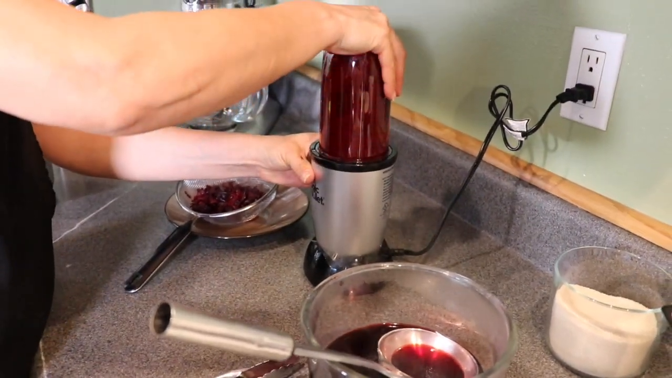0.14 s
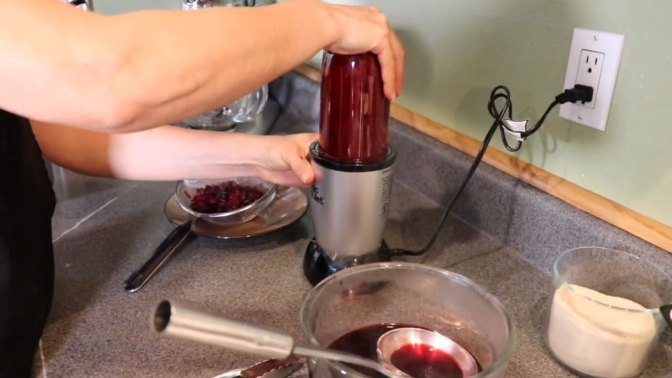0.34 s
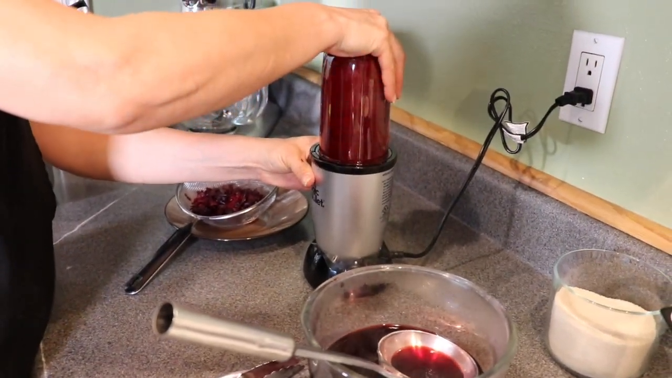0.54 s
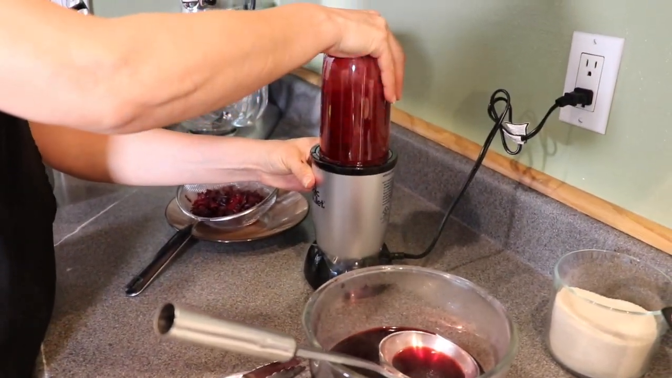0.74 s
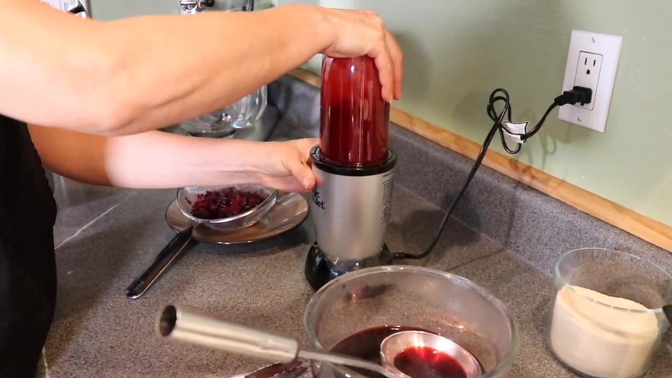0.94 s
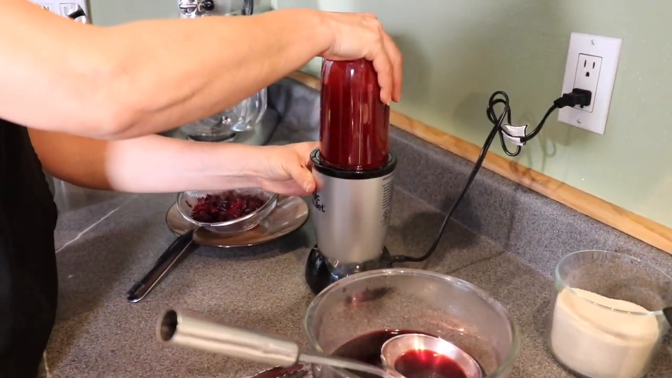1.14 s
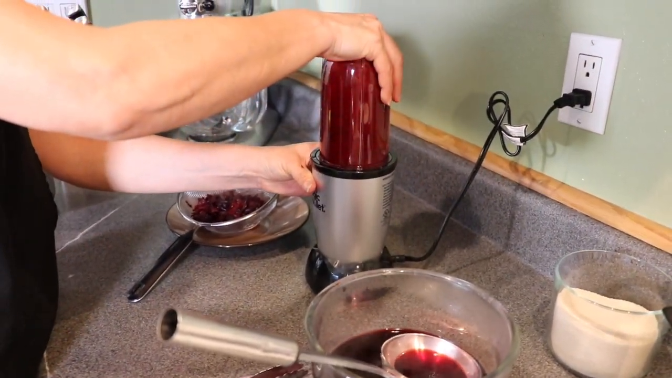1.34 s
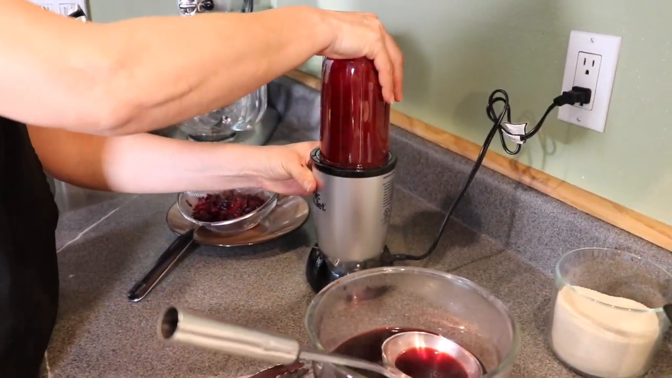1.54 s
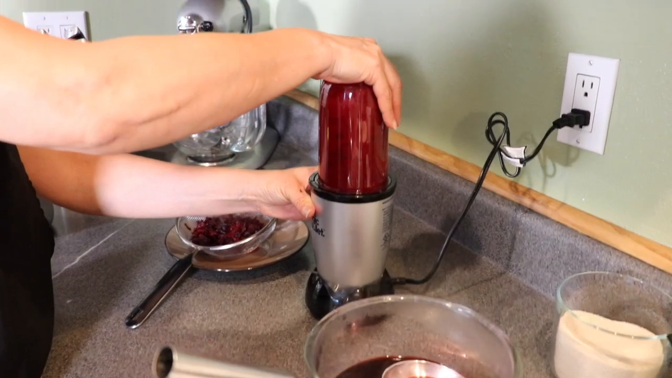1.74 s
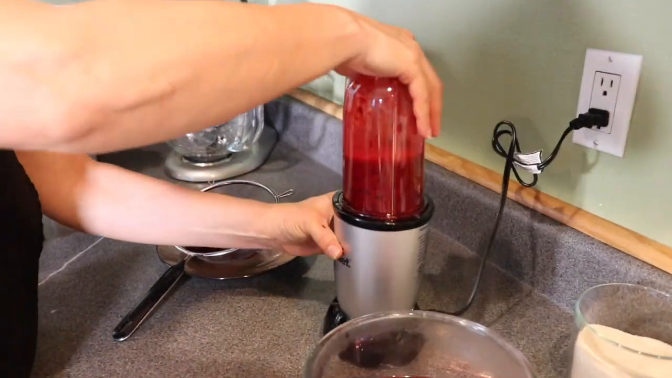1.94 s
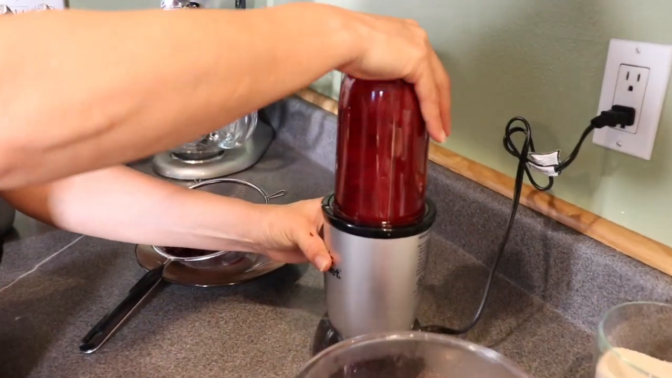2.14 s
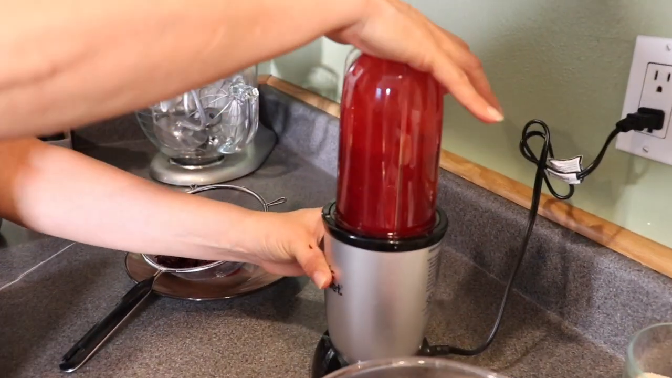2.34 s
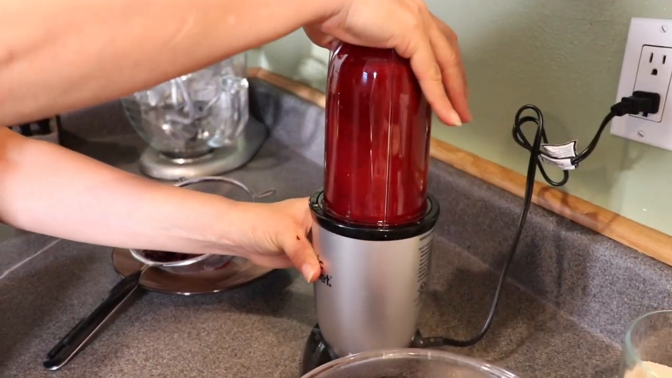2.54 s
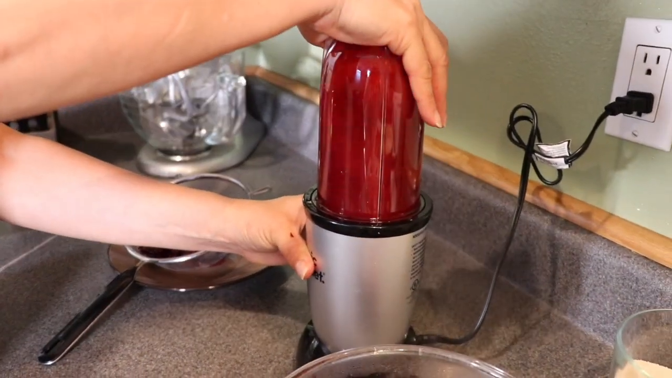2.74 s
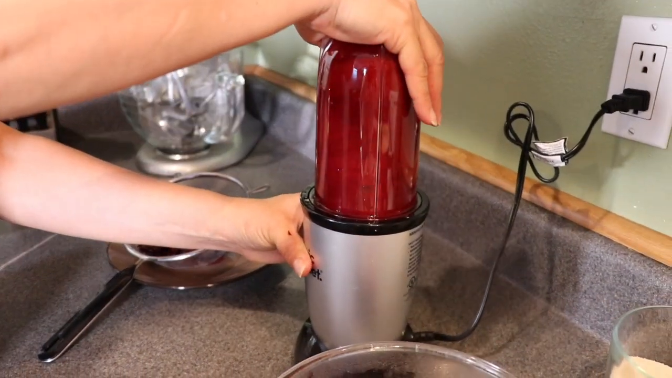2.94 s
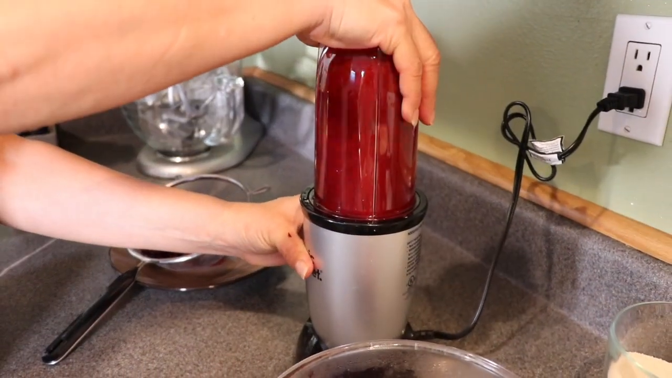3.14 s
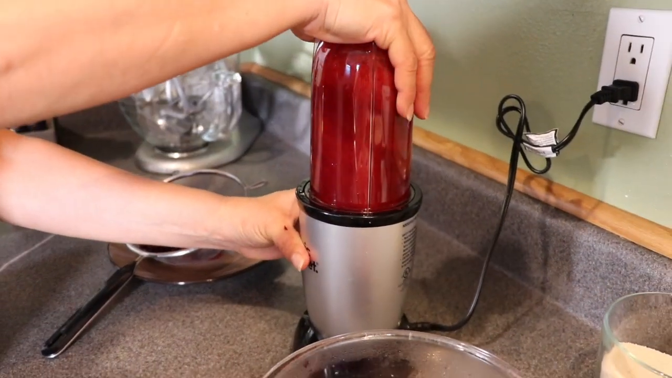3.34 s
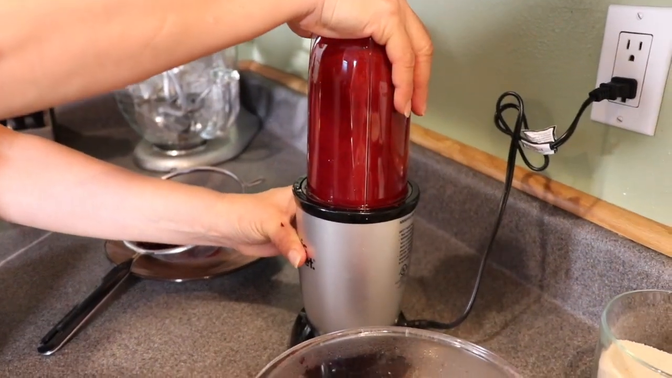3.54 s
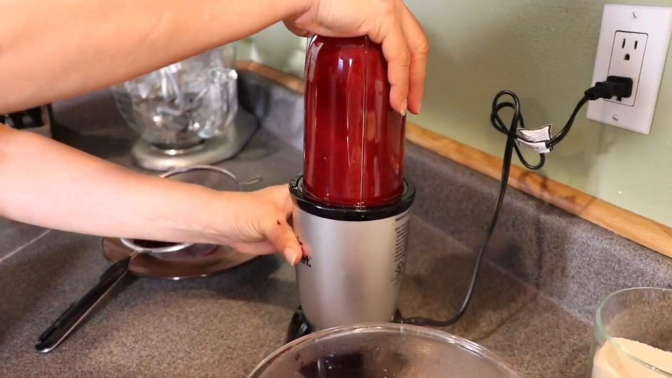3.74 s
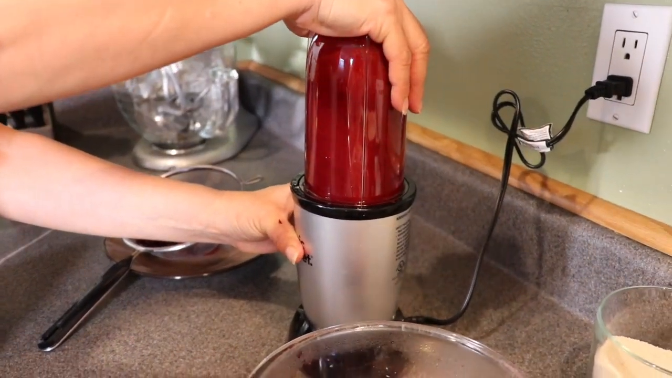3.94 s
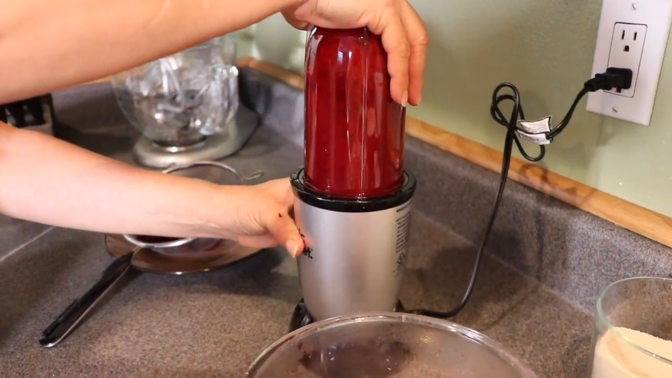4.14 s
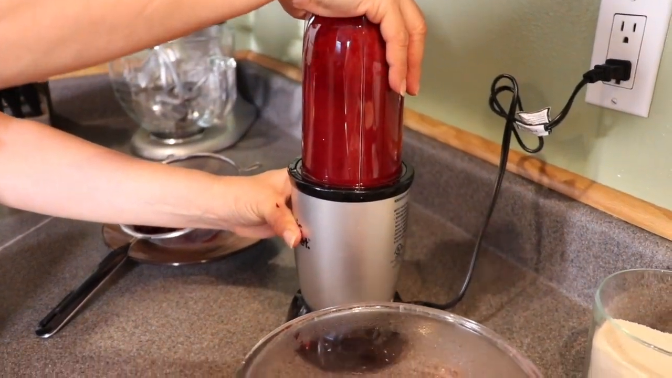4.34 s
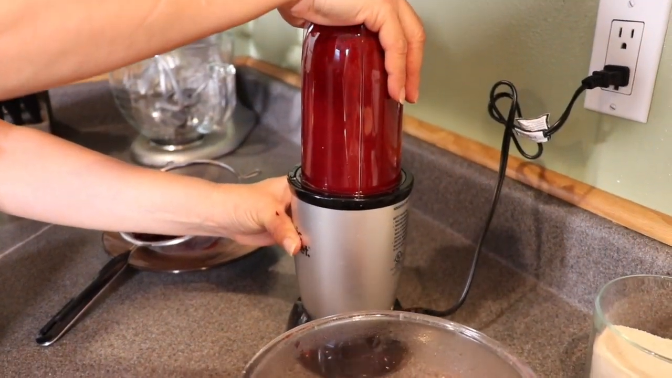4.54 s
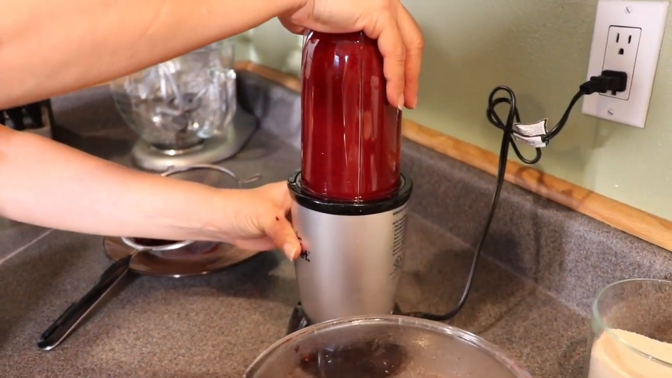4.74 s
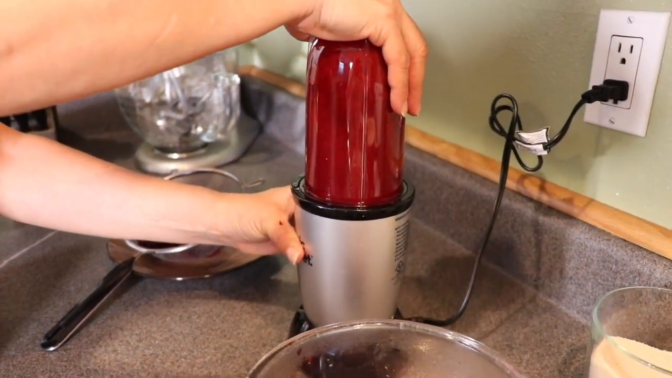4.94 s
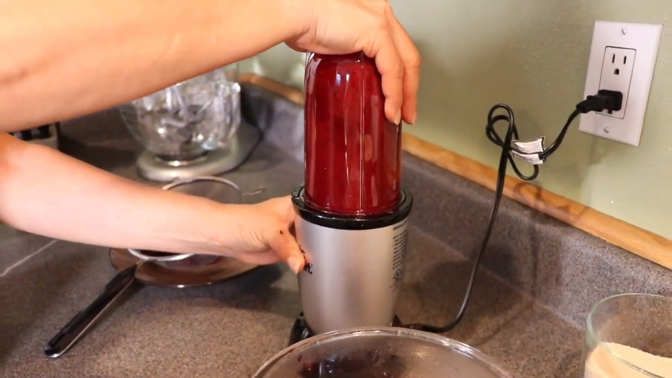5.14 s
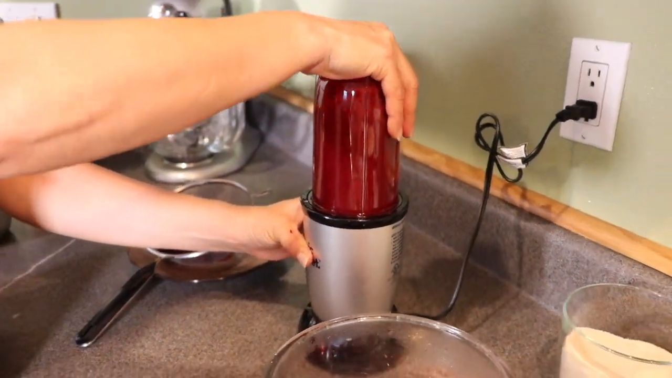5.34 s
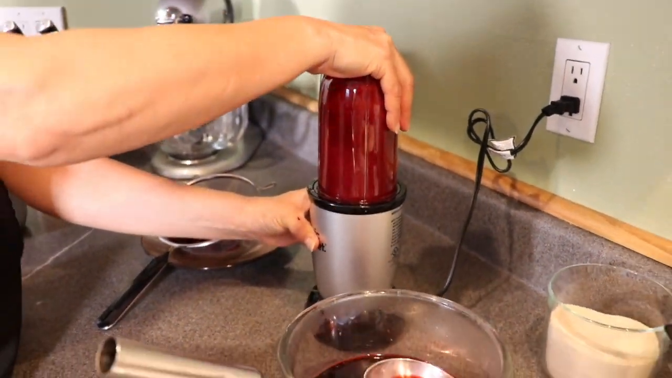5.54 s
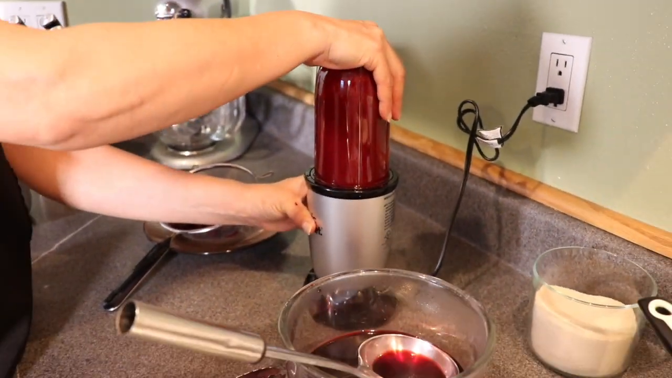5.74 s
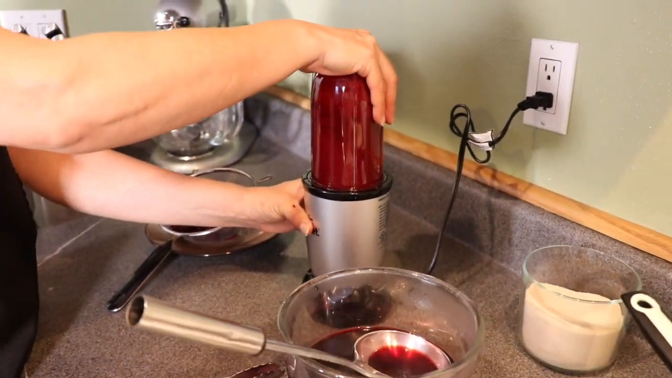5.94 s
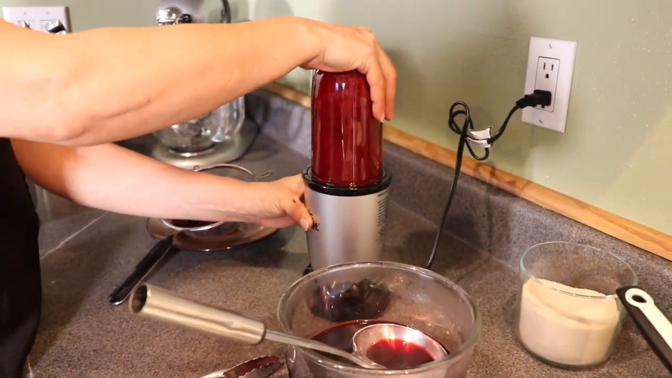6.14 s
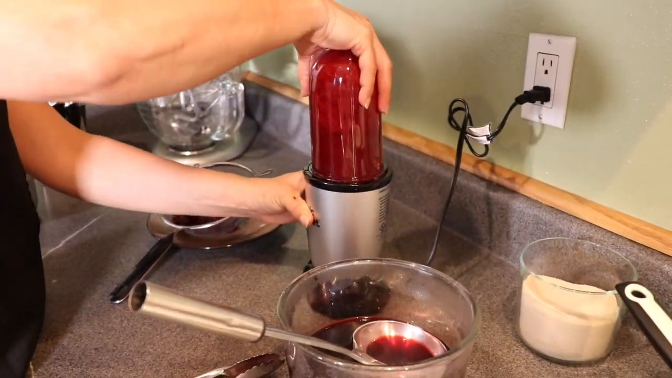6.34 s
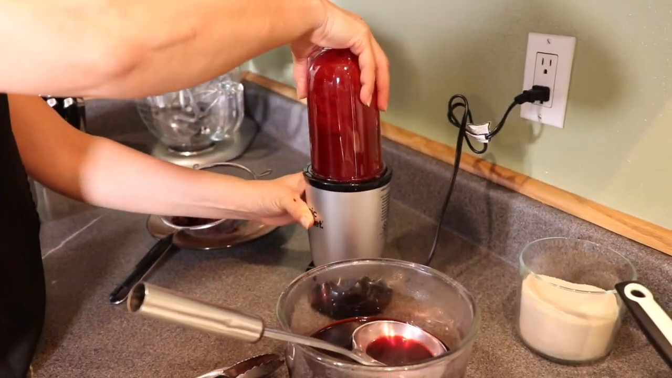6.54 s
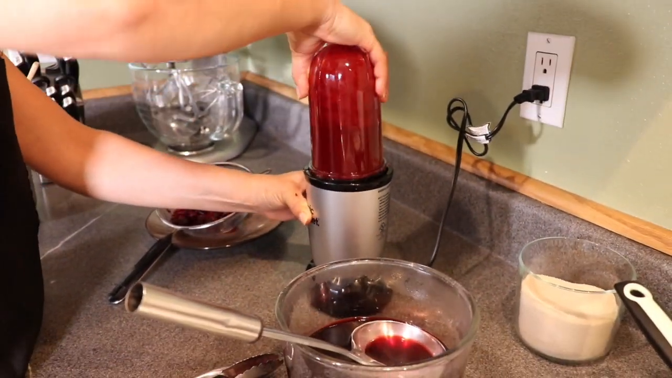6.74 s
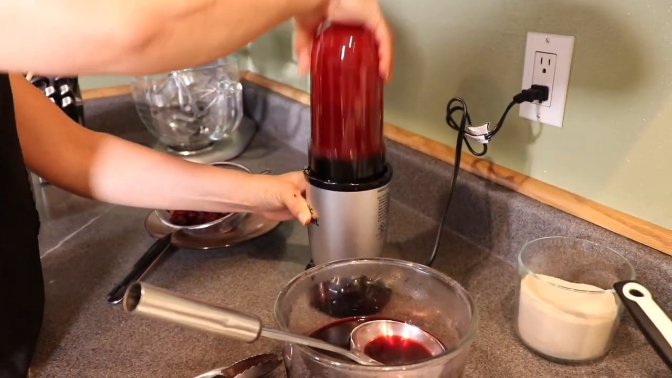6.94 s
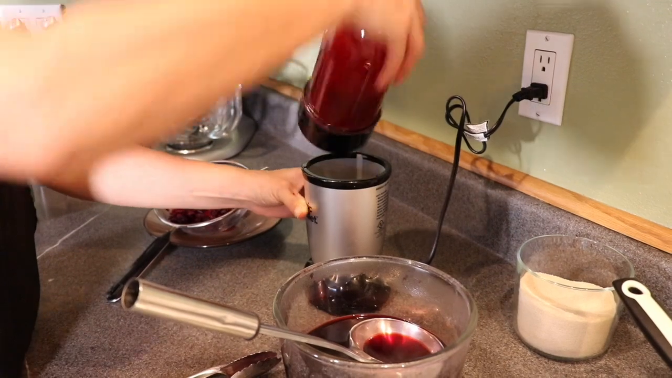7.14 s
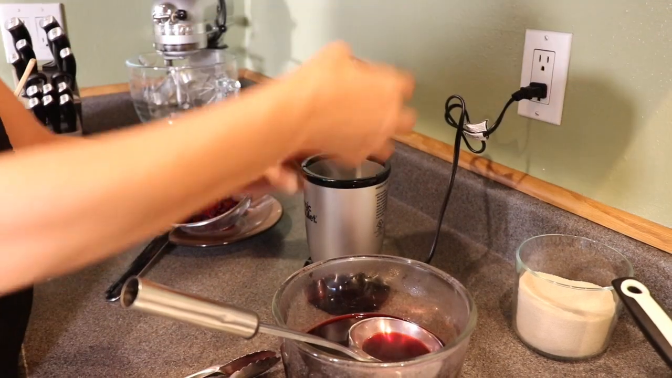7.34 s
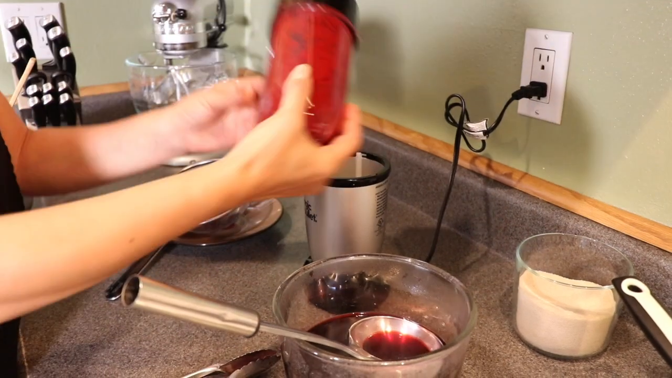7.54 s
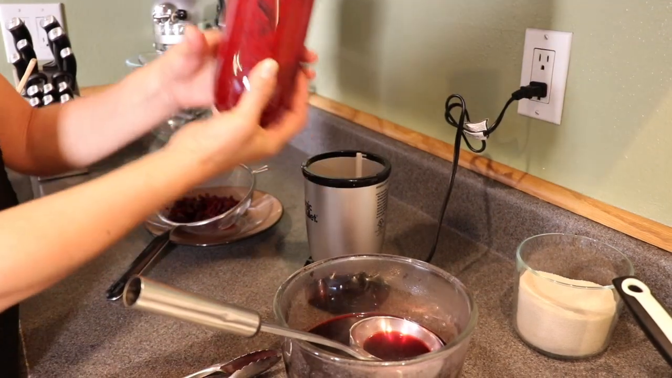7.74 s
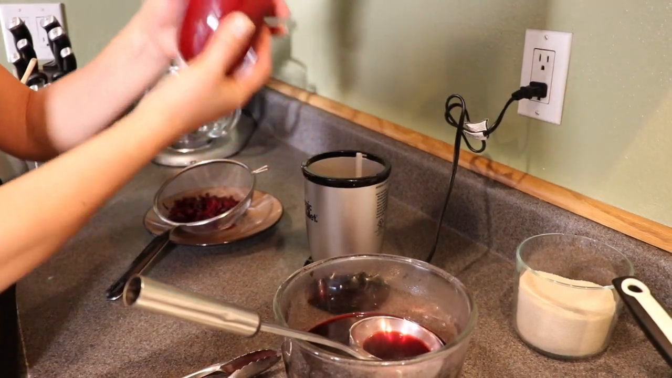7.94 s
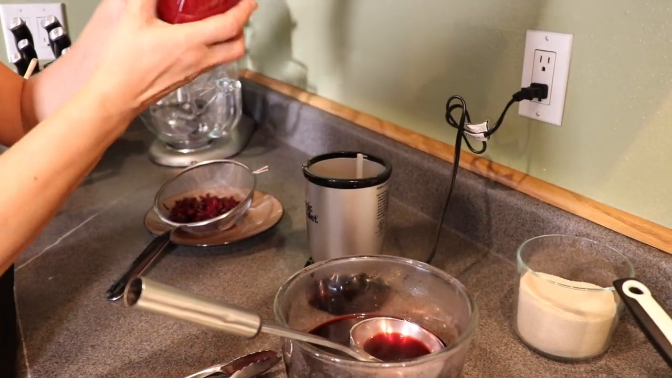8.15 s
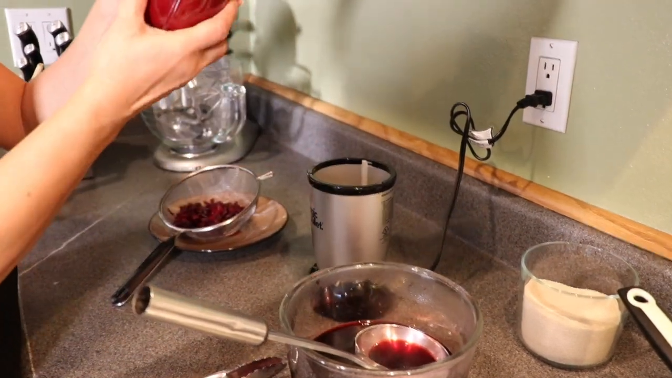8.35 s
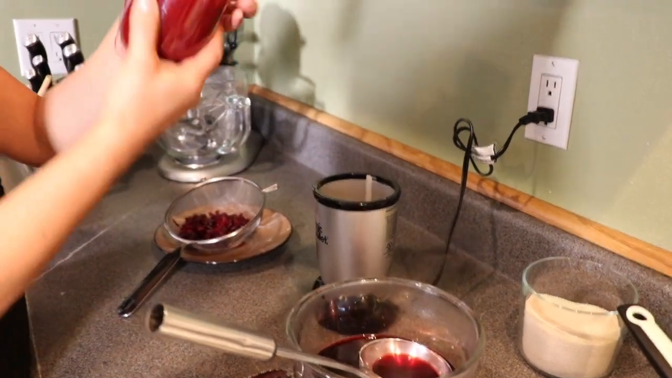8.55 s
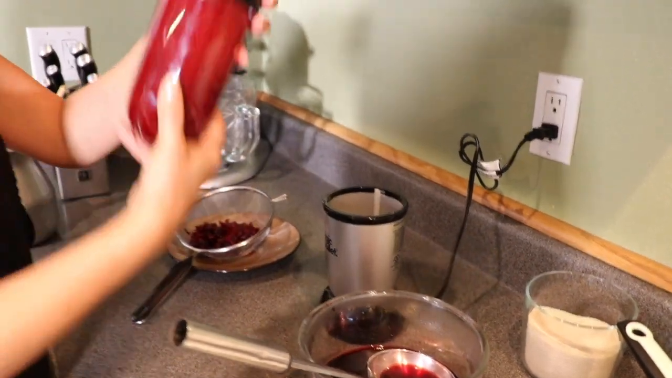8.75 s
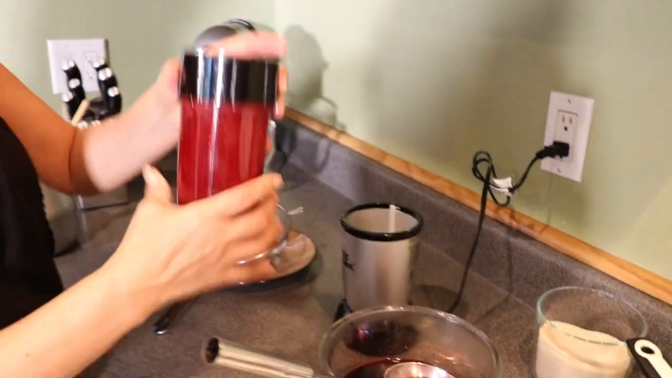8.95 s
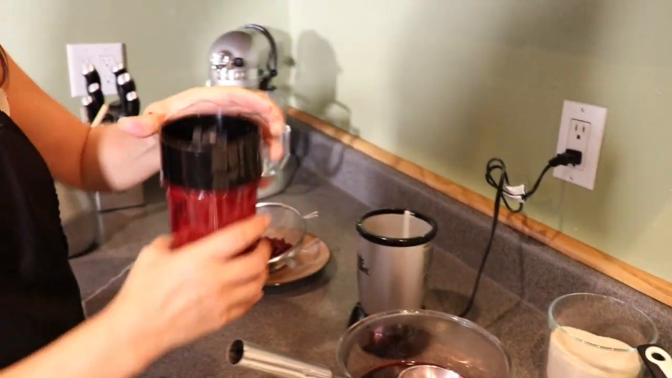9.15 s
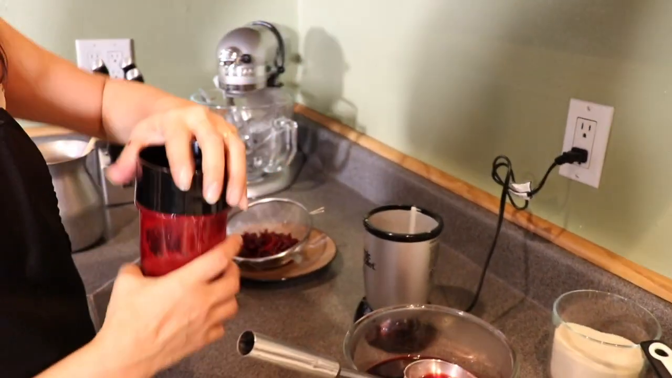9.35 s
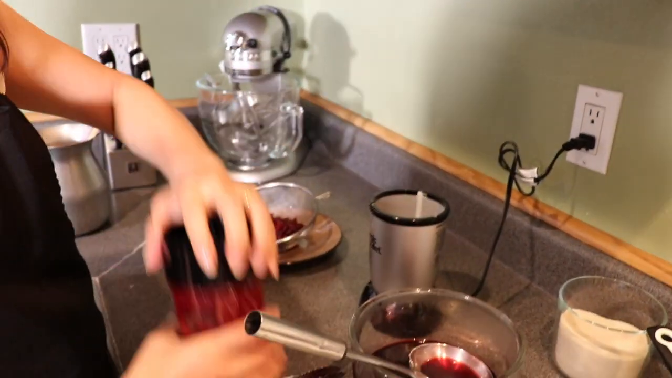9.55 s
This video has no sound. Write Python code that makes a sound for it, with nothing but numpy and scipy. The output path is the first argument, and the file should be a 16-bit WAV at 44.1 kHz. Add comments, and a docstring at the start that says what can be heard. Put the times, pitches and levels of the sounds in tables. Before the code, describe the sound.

A small blender, close and slightly right, is already grinding soaked flowers: loud, coarse and raspy, surging about four times a second with bright cracks of bits hitting the cup. At 1.6 seconds the level drops abruptly to quieter, rapidly fluttering wet churning, which stops at 1.85. A long pulse runs from 2.1 to 5.1 seconds with a hollow drone and soft thumps, and a short one from 5.3 to 6.1, with faint plastic clicks between. At 6.3 the kitchen's low hum and hiss come up. From 6.6 to 6.8 the plastic cup is twisted free with a loud, hollow, scraping clatter, followed by lighter knocks until 7.2. Faint bubbly swishes and small clicks come around 7.9 and from 8.8 to 9.6 as the cup is turned over. Two dull taps hit the microphone on the left at about 8.6 and 8.75.

```python
"""Small blender on a kitchen counter

Close stereo microphone, the blender a little to the right, over the hum of the room. It is pulsed three
times on soaked flowers. The loud, coarse grinding drops abruptly in level at 1.58 s, and the first pulse
goes on as quieter churning, surging as the vortex falls onto the blades; two more such pulses follow.
The plastic cup is twisted free with a clatter and turned over in the hands; two taps hit the microphone."""
import sys
import numpy as np
from scipy import signal
from scipy.fft import rfft, irfft
from scipy.io import wavfile

SR = 44100
rng = np.random.default_rng(int(sys.argv[2]) if len(sys.argv) > 2 else 0)


def generate_wav(signal):
    """Clip the signal to [-1, 1] and save it as 16-bit WAV at the path in sys.argv[1]."""
    frames = np.transpose(np.atleast_2d(signal))
    scaled = np.clip(frames, -1, 1) * 32767
    pcm = np.round(scaled).astype(np.int16)
    wavfile.write(sys.argv[1], SR, pcm)


N = 422919
TAPS = 4096
TIME = np.arange(N) / SR
FREQS = np.maximum(np.arange(TAPS // 2 + 1) * SR / TAPS, 1)

# Stretches of churning; the first takes over from the loud grinding in mid-pulse: start_s, switch_off_s
RUNS = [(1.574, 1.85), (2.084, 5.116), (5.264, 6.134)]
# Loudness of the churning: time_s, body_db, rasp_db, fizz_db
PULP = [(1.6, -45.5, -42.5, -56.5), (1.81, -47, -47.5, -64), (1.85, -64, -67, -81),
        (2.09, -44, -40.5, -54.5), (2.2, -42.5, -41.5, -53.5), (2.9, -47, -42, -57), (3.2, -47.5, -43, -58),
        (3.65, -44, -42, -55), (4.5, -46, -43.5, -55.5), (5.1, -44.5, -42.5, -55), (5.33, -43, -40, -52.5),
        (5.55, -46, -42.5, -54.5), (6.12, -45.5, -42.5, -58)]
# The clump of flowers comes round onto the blades: peak_s, strength_db, rise_s, thump_db
BITES = [(-0.015, -3.5, .058, -37), (0.215, -1, 0.09, -30.5), (0.474, -1.8, 0.095, -34),
         (0.712, 0, 0.062, -31), (0.95, 0, 0.057, -42), (1.174, -2, 0.064, -39), (1.379, -1, 0.04, -34),
         (1.575, 1, 0.023, -57)]
THUMP_LAG_S = 0.0461   # from a bite to its thump
# Plastic knocks of switch, cup and base: start_s, body_db, crack_db, treble_db
KNOCKS = [(1.872, -72, -52, -55.5), (1.923, -57, -54.5, -64), (1.974, -67, -58.5, -79.5),
          (5.109, -51, -45.5, -63), (5.221, -81, -75, -81), (6.252, -74, -67, -60.5),
          (6.405, -51, -56, -67), (6.5943, -42, -38, -48), (6.616, -29, -35, -47),
          (6.6254, -26.5, -22, -38), (6.6445, -14, -15.5, -28), (6.652, -17, -25, -29),
          (6.675, -32, -36, -47), (6.6915, -23, -20.5, -39), (6.703, -24, -38, -42),
          (6.729, -27.5, -38, -34.5), (6.7489, -27.5, -27.5, -47), (6.778, -40, -44, -55),
          (6.815, -46, -44, -44.5), (6.9714, -39.5, -36.5, -49.5), (6.986, -52, -42, -55),
          (7.083, -41.5, -43.5, -48), (7.104, -52, -44.5, -43.5), (7.122, -43, -47, -50),
          (7.157, -46, -50, -62), (7.925, -52, -57, -51.5), (9.138, -62, -53, -54)]
# Airy swishes as the cup is turned over: peak_s, half_length_s, middle_db, treble_db
SWISHES = [(7.93, 0.22, -67, -61.5), (8.93, 0.18, -56.5, -61.5), (9.159, 0.062, -55.5, -60.5),
           (9.45, .25, -60.5, -68)]
# Broad spectrum of the loud, coarse grinding: frequency_hz, level_db
COARSE_SPECTRUM = [(35, -15), (65, -28), (100, -14.5), (180, -26), (320, -25.5), (600, -20.5),
                   (1200, -12.5), (2600, -19), (3700, -16), (4800, -28), (7800, -32), (11000, -41),
                   (15000, -49)]
# Broad spectrum of the knocked cup: frequency_hz, level_db
CUP_SPECTRUM = [(35, -14), (65, -20), (100, -7.5), (180, -19), (320, -18), (600, -22), (1200, -22.5),
                (2600, -27), (3700, -21), (4800, -36.5), (7800, -41), (11000, -44.5), (15000, -61)]
# Resonances of the knocked cup: centre_hz, width_hz, lift_db
CUP_MODES = [(263.4, 40, 11.5), (350, 63, 12.5), (388, 27, 5.9), (521, 68, 10.5), (594, 93, 7.1),
             (687, 56, 6.7), (867, 61, 9.7), (1006, 61, 7.7), (1716, 90, 8.9), (2155, 300, 9.9),
             (2440, 200, 11), (3110, 500, 6.7), (4080, 110, 3.044), (6030, 150, 5)]
# Low, middle and treble bands: low_hz, high_hz
BANDS_HZ = [(40, 1100), (1100, 4800), (4800, 20000)]
# The room's air in those bands, and its drop in level while the blender is in use
ROOM_DB, ROOM_FAINT_DB = (-51.5, -61.5, -65), (-23.5, -22, -26.5)


def from_db(db):
    return np.exp(np.asarray(db) * (np.log(10) / 20))


def unit_rms(x):
    return x / np.sqrt(np.mean(x ** 2) + 1e-20)


def add(out, s, sound):
    """Mix a short sound in at time s."""
    at = max(round(s * SR), 0)
    out[..., at:at + sound.shape[-1]] += sound[..., :N - at]


def in_time(rows):
    """Each column of a curve, joined by straight lines."""
    s, *columns = np.transpose(rows)
    return [np.interp(TIME, s, column) for column in columns]


def over_hz(points):
    """A spectrum joined by straight lines on a log axis."""
    hz, value = np.transpose(points)
    return np.interp(np.log(FREQS), np.log(hz), value)


def causal(gain):
    """Minimum-phase impulse response with the given gain per frequency."""
    cepstrum = irfft(np.log(gain + 1e-6 * gain.max()))
    cepstrum[1:TAPS // 2] *= 2
    cepstrum[TAPS // 2 + 1:] = 0
    return irfft(np.exp(rfft(cepstrum)))


def through(x, response):
    """Filter along time."""
    return signal.oaconvolve(x, response if x.ndim == 1 else response[None], axes=-1)[..., :N]


def body(spectrum, modes, low, high):
    """Response of a resonant body within one band; it keeps the power of white noise."""
    peaks_db = sum(lift / (1 + (2 * (FREQS - hz) / width) ** 2) for hz, width, lift in modes)
    band = ((1 + (low / FREQS) ** 12) * (1 + (FREQS / high) ** 12)) ** -.5
    response = causal(from_db(over_hz(spectrum) + peaks_db) * band)
    return response / np.linalg.norm(response)


def noise():
    """Two unrelated white noises: the direct sound and the diffuse reflections."""
    return rng.standard_normal((2, N))


def flutter(per_s):
    """Smooth random wavering of rms 1."""
    knots = rng.standard_normal(int(per_s * N / SR) + 2)
    return unit_rms(np.interp(TIME * per_s, np.arange(len(knots)), knots))


def impacts(per_s, spread_db):
    """Random clicks, many small and a few large; rms 1."""
    sizes = from_db(spread_db * np.minimum(rng.exponential(1, N), 4))
    return unit_rms(sizes * (rng.random(N) < per_s / SR) * rng.choice([-1, 1], (2, N)))


def gritty(clicks, share):
    """Turbulence with a share of its power in clicks."""
    return share ** .5 * clicks + (1 - share) ** .5 * noise()


def snap(decay_s, click_share):
    """A hard contact: one click, then its scatter inside the cup and off the counter."""
    burst = rng.standard_normal((2, TAPS)) * np.exp(-TIME[:TAPS] / decay_s)
    burst /= np.linalg.norm(burst, axis=1, keepdims=True)
    burst[0] *= (1 - click_share) ** .5
    burst[0, 0] += click_share ** .5
    return burst


def in_kitchen(sound, spread, pan, left_lag_samples):
    """Reflections off counter and walls widen the sound on its way to the microphone pair."""
    direct, diffuse = sound
    side = through(diffuse, causal(from_db(over_hz(spread))))
    tilt = from_db(over_hz(pan))
    left = through(direct + side, causal(2 * tilt / (1 + tilt)))
    right = through(direct - side, causal(2 / (1 + tilt)))
    return np.array([np.pad(left, (left_lag_samples, 0))[:N], right])


def room_gain(db, faint_db, return_s=6.308, short_db=-4.5, settle_s=0.21):
    """The room is faint until the last run is over, then jumps to just short of full and settles."""
    age = TIME - return_s
    back = np.clip(age / 0.0037, 0, 1)
    settling_db = short_db * np.exp(-np.maximum(age, 0) / settle_s)
    return from_db(db + (1 - back) * faint_db + back * settling_db)


def room_air(swish_body_db=1.5):
    """A low hum in the resonances of the kitchen with hiss above it; both swell in each swish."""
    # Broad spectrum of the room tone: frequency_hz, level_db
    spectrum = [(35, 0.5), (100, -10), (170, -15.5), (300, -11), (600, -17), (1200, -19), (2600, -23.5),
                (4800, -29), (7000, -24), (11000, -27), (15000, -34.5)]
    # Resonances of the kitchen: centre_hz, width_hz, lift_db
    modes = [(246, 33, 11), (362, 36, 8.5), (417.4, 16, 8.7), (462, 21, 6.7), (612, 30, 8.4), (745, 71, 5),
             (1220, 70, 5.8)]
    powers = [room_gain(db, faint_db) ** 2 for db, faint_db in zip(ROOM_DB, ROOM_FAINT_DB)]
    for s, half_s, middle_db, treble_db in SWISHES:
        swell = np.exp(-((TIME - s) / half_s) ** 2)
        band_db = (middle_db + swish_body_db, middle_db, treble_db)
        powers = [power + from_db(db) ** 2 * swell for power, db in zip(powers, band_db)]
    return sum(through(np.sqrt(power) * noise(), body(spectrum, modes, *band))
               for power, band in zip(powers, BANDS_HZ))


def hum_tones(waver_db=2.0, wander_rad=.12):
    """Wavering tones that rise with the hum of the room."""
    # Tones in the hum: pitch_hz, relative_db
    tones = [(207, -17), (243, -11.5), (414.5, -6.5)]
    out = 0
    for hz, db in tones:
        level = from_db(db + waver_db * flutter(per_s=5.2))
        out += level * np.sin(2 * np.pi * hz * TIME + wander_rad * flutter(per_s=8.6))
    return out * room_gain(ROOM_DB[0], ROOM_FAINT_DB[0])


def housing_taps(contact_s=0.00075, hardness=.8, rock_hz=60, rock_t60=0.12,
                 tick_hz=1400, tick_t60=0.029):
    """A tap on the microphone: push, rebound and tick, then the housing rocks; soft taps are duller."""
    # Taps on the housing: start_s, level_db, left_minus_right_db
    taps = [(8.6169, -26.5, 24), (8.744, -34.5, 18)]
    out, age = np.zeros((2, N)), TIME[:SR // 3]
    push = age / contact_s - 2
    tick = from_db(-13 - 60 * age / tick_t60) * np.sin(2 * np.pi * tick_hz * age)
    contact = from_db(1.5) * push * np.exp((1 - push ** 2) / 2) + tick
    rock = from_db(2 - 60 * age / rock_t60) * np.sin(2 * np.pi * rock_hz * age)
    hardest_db = max(db for _, db, _ in taps)
    for s, db, pan in taps:
        sharpness = from_db(hardness * (db - hardest_db))
        add(out, s, from_db([[db], [db - pan]]) * (sharpness * contact + rock))
    return out


def counter_bumps(band_hz=(42, 85), top_hz=600):
    """The blender bumps the counter as it starts or is handled: a dull rumble that dies away."""
    # Soft bumps: start_s, level_db, t60_s, left_minus_right_db
    bumps = [(2.095, -55, 0.4, -2), (5.272, -53, 0.54, -2), (6.42, -46, 0.64, -2)]
    envelope, age = np.zeros((2, N)), TIME[:SR]
    for s, db, t60, pan in bumps:
        add(envelope[0], s, from_db(db + pan / 2 - 60 * age / t60))
        add(envelope[1], s, from_db(db - pan / 2 - 60 * age / t60))
    rumble = signal.lfilter(*signal.butter(1, band_hz, "band", fs=SR), rng.standard_normal(N))
    return envelope * unit_rms(signal.lfilter(*signal.butter(2, top_hz, fs=SR), rumble))


def bubbles(gain_db=2.5, spread_db=1.5, low_hz=1100, high_hz=3600, cycles=45, climb=0.093, count=14):
    """Small bubbles break in the pulp during each swish; each rings briefly and rises in pitch."""
    out, age = np.zeros(N), TIME[:SR // 12]
    for s, half_s, middle_db, _ in SWISHES:
        starts = s + half_s * rng.uniform(-1, 1, count)
        for start, size, pitch in zip(starts, rng.standard_normal(count), rng.random(count)):
            hz = low_hz * (high_hz / low_hz) ** pitch
            life = age * hz / cycles
            fade = from_db(middle_db + gain_db + spread_db * size - 60 * life)
            if start < TIME[-1]:
                add(out, start, fade * np.sin(2 * np.pi * hz * age * (1 + climb * life)))
    return out


def clacks(crack_t60=0.034, gain_db=-3.5, width=.3, ring_db=-5.0):
    """A light tap is a dry crack around one mode of the cup, which rings on briefly."""
    # The cup in the hands: start_s, level_db, pitch_hz, relative_crack_db
    taps = [(6.4055, -36.5, 1710, -12), (6.9707, -32, 2190, -11), (7.084, -39, 4030, -6),
            (7.132, -38, 1810, -12), (7.9116, -40.5, 2040, -5), (9.1376, -36, 2000, -6.5),
            (9.1644, -39, 1460, -4)]
    out, age = np.zeros(N), TIME[:SR // 4]
    fade = from_db(-60 * age / crack_t60)
    for s, db, hz, crack_db in taps:
        band = signal.butter(1, [hz / (1 + width), hz * (1 + width)], "band", fs=SR)
        crack = unit_rms(signal.lfilter(*band, rng.standard_normal(len(age)))) * fade
        ring = from_db(ring_db) * np.sin(2 * np.pi * hz * age) * fade ** .5
        add(out, s, from_db(db + gain_db) * (from_db(crack_db) * crack + ring))
    return out


def thumps(width_s=0.014, gain_db=-1.5, rock_hz=100, sag_per_s=2.7, overtone_hz=245, lumps_per_s=5):
    """The cup rocks for a few slowing cycles: after each bite, on lumps in the pulp, and when handled."""
    # The load settles and the cup is twisted free: peak_s, level_db, pitch_hz
    jolts = [(1.928, -47, 104.5), (1.987, -53, 102), (2.039, -52, 101), (2.12, -43, 140),
             (5.29, -38.5, 116), (6.419, -40.5, 104.2), (6.64, -23, 97), (6.688, -22.5, 101),
             (6.725, -26, 96), (6.755, -25, 100), (6.864, -38, 109), (6.993, -28, 110), (7.062, -43, 107),
             (7.137, -38, 96)]
    rows = jolts + [(s + THUMP_LAG_S, thump_db, rock_hz) for s, _, _, thump_db in BITES]
    fizz_db = in_time(PULP)[2]
    vigour_db = fizz_db - np.median(fizz_db[TIME < RUNS[-1][1]])
    for k, (chance, size) in enumerate(zip(rng.random(64), rng.standard_normal(64))):
        s = (k + chance) / lumps_per_s
        if any(start < s < off for start, off in RUNS):
            lump_db = -50 + 1.3 * np.interp(s, TIME, vigour_db) - 0.5 * size
            rows.append((s, lump_db, rock_hz))
    out, age = np.zeros(N), TIME[:SR // 5] - TIME[SR // 10]
    swell = np.exp(-(age / width_s) ** 2)
    overtone = from_db(-11) * np.sin(2 * np.pi * overtone_hz * age)
    for (s, db, hz), phase in zip(rows, rng.uniform(0, 2 * np.pi, 128)):
        rock = np.sin(2 * np.pi * hz * age * (1 - sag_per_s * age) + phase)
        swing = from_db(db + gain_db) * swell * (rock + overtone)
        add(out, s + age[0], swing[s + age >= 0])
    return out


def hollow_ring(gain_db=-2.5, uneven_db=0.5):
    """Every knock sets the low modes of the cup ringing, each with a strength of its own."""
    # Low modes of cup and base: pitch_hz, level_db, t60_s
    low_modes = [(263, -5, 0.15), (340.4, -7, .34), (388, -6.5, 0.34), (463, -19, .25), (524, -14, 0.3),
                 (858, -9, 0.14), (1042, -14, 0.14)]
    out, age = np.zeros(N), TIME[:SR // 2]
    hz, db, t60 = np.transpose(low_modes)
    rings = from_db(db[:, None] - 60 * age / t60[:, None]) * np.sin(2 * np.pi * hz[:, None] * age)
    for s, body_db, _, _ in KNOCKS:
        size, polarity = rng.standard_normal((2, len(hz)))
        strengths = from_db(body_db + gain_db + uneven_db * size) * np.sign(polarity)
        add(out, s, strengths @ rings)
    return out


def knocks(attack_s=0.001):
    """Each knock is a short crack and a faint tail in the room; the lows ring longest."""
    # One row a band: gain_db, crack_t60_s, tail_db, tail_t60_s
    decays = [(-2.5, 0.12, -14.5, 0.56), (3.5, 0.04, -15.0, 0.34), (1.5, 0.084, -14, 0.37)]
    age, out = TIME[:SR // 2], 0
    for k, (gain_db, crack_t60, tail_db, tail_t60) in enumerate(decays):
        fade = from_db(-60 * age / crack_t60) ** 2 + from_db(tail_db - 60 * age / tail_t60) ** 2
        fade *= (1 - np.exp(-age / attack_s)) ** 2
        power = np.zeros(N)
        for s, *band_db in KNOCKS:
            add(power, s, from_db(band_db[k] + gain_db) ** 2 * fade)
        out += through(np.sqrt(power + 1e-16) * noise(), body(CUP_SPECTRUM, CUP_MODES, *BANDS_HZ[k]))
    return out


def catches(gain_db=19.0, lag_s=0.00202):
    """The sharp first contact of each plastic knock."""
    out = np.zeros((2, N))
    for s, _, crack_db, _ in KNOCKS:
        add(out, s + lag_s, from_db(crack_db + gain_db) * snap(decay_s=0.0072, click_share=0.3))
    return through(out, body(CUP_SPECTRUM, CUP_MODES, *BANDS_HZ[1]))


def twist(start_s=6.652, end_s=6.755, band_db=(-30, -43, -45), release_s=0.018):
    """The lugs grind round in their slots: dense slips ring the cup."""
    grip = np.clip((TIME - start_s) / .005, 0, 1) * np.exp(-np.clip(TIME - end_s, 0, 1) / release_s)
    slips = gritty(impacts(per_s=790, spread_db=3.5), share=0.35) * grip
    return sum(from_db(db) * through(slips, body(CUP_SPECTRUM, CUP_MODES, *band))
               for db, band in zip(band_db, BANDS_HZ))


def run_gain(rise_s, coast_db_per_s):
    """Each stretch of churning fades in quickly; at switch-off the pulp brakes the blades."""
    return sum(np.clip((TIME - start) / rise_s, 0, 1)
               * from_db(-coast_db_per_s * np.clip(TIME - off, 0, .5)) for start, off in RUNS)


def vortex_surge(first_peak_s=0.02):
    """A swing that peaks at each fall of the vortex, begun anew in each stretch of churning."""
    # How often the vortex falls onto the blades: time_s, rate_hz
    surge_rate = [(1.59, 19.77), (1.81, 18.51), (2.1, 16.0), (2.25, 19.28), (2.5, 19.06), (2.64, 15.49),
                  (2.82, 19.58), (2.96, 14.53), (3.1, 15.31), (3.25, 13.68), (3.45, 14.11), (3.6, 15.25),
                  (3.78, 16.05), (3.9, 13.98), (4.1, 14.36), (4.4, 13.43), (4.6, 14.39), (4.75, 12.31),
                  (4.98, 13.78), (5.1, 16.06), (5.28, 16.7), (5.42, 12.6), (5.7, 12.82), (6.12, 13.08)]
    turned = np.cumsum(in_time(surge_rate)[0]) / SR
    cycles = np.zeros(N)
    for start, _ in RUNS:
        cycles = np.where(TIME >= start, turned - np.interp(start + first_peak_s, TIME, turned), cycles)
    return np.cos(2 * np.pi * cycles)


def drone(width_hz=32, swing_db=1.0):
    """From the second pulse on, the motor drives a resonance that shifts as the pulp climbs the wall."""
    # Hollow resonance of the filled cup: time_s, pitch_hz, level_db
    resonance = [(2.1, 339.5, -49), (2.8, 333, -51), (3.05, 394, -61), (3.45, 388, -56), (3.7, 350.4, -51),
                 (4.3, 339.1, -54.5), (5.05, 364, -53), (5.4, 385.6, -50.5), (6.1, 350, -56.5)]
    hz, db = in_time(resonance)
    sway = signal.sosfilt(signal.butter(2, width_hz / 2, fs=SR, output="sos"), noise())
    phase = 2 * np.pi * np.cumsum(hz) / SR
    tone = unit_rms(sway[0] * np.cos(phase) + sway[1] * np.sin(phase))
    running = run_gain(rise_s=0.013, coast_db_per_s=341) * (TIME > RUNS[1][0])
    return tone * from_db(db + swing_db * vortex_surge()) * running


def hard_bits():
    """Hard bits flung against the cup each make a short, bright crack."""
    # Hits on the wall: start_s, strength_db
    hits = [(0.003, -7), (0.0332, -0.5), (0.1134, 2), (0.176, -6), (0.2087, -4), (0.263, -3), (0.386, 2.5),
            (0.4394, 2), (0.4614, 0.5), (0.483, -5), (0.51, -3), (0.5364, -7), (0.6075, -16), (0.7726, -8),
            (0.816, -12), (0.868, -7.5), (0.9175, -4), (0.9355, -5), (0.9687, -1), (1.0335, -4),
            (1.1277, -8), (1.165, -7), (1.177, -5), (1.2418, -5), (1.3143, -5), (1.365, -1.5),
            (1.4298, -10), (1.4495, -12), (1.52, -8), (1.5643, 0.5), (1.6435, -11.5)]
    # What a hit rings in the wall: centre_hz, width_hz, lift_db
    wall_modes = [(2153, 220, 13.5), (2940, 140, 15), (3284, 270, 16), (3600, 200, 8)]
    out = np.zeros((2, N))
    for s, db in hits:
        add(out, s, from_db(db) * snap(decay_s=0.0058, click_share=0.46))
    return through(out, body(COARSE_SPECTRUM, wall_modes, BANDS_HZ[1][0], BANDS_HZ[2][1]))


def slosh(sound, depth_s=0.00047, per_s=11):
    """Sloshing liquid bends the low resonances of the cup up and down."""
    bent = TIME + depth_s * flutter(per_s)
    return np.array([np.interp(bent, TIME, part) for part in sound])


def strokes(per_s, decay_s):
    """Uneven blows of the blades on loose pieces, each a short burst of its own strength; mean 1."""
    blows = (rng.random(N) < per_s / SR) * rng.uniform(.5, 1, N)
    age = TIME[:TAPS] / decay_s
    bursts = through(blows, age * np.exp(-age))
    return bursts / np.mean(bursts)


def blade_load_db(rest_db=-8, fall_s=0.026):
    """Load on the blades: it swells and falls with each bite, over a steady rest."""
    power = from_db(rest_db) ** 2
    for s, db, rise_s, _ in BITES:
        age = TIME - s
        power = power + from_db(db) ** 2 * np.exp(-(age / np.where(age < 0, rise_s, fall_s)) ** 2)
    return 10 * np.log10(power)


def grinding(drop_s=1.576, grit=0.28, slap_db=3.5, slap_s=0.03, fizz_sag_db_per_s=1.7):
    """Blades tear the flowers and ring the cup: heavy load is brighter, a clump on the wall booms."""
    # Resonances of the cup in the loud grinding: centre_hz, width_hz, lift_db
    modes = [(253, 85, 8), (338.5, 40, 15), (398.4, 104, 15.5), (509.6, 80, 14), (723, 49, 9),
             (781, 55, 6.5), (846, 20, 10), (874.8, 30, 17), (1920, 60, 5.5), (2050, 50, 2.5),
             (2152, 62, 7), (2230, 360, 4.5), (2714, 75, 7.5), (2878, 74, 10.5), (3150, 86, 4.5),
             (3330, 300, 7), (4090, 90, 2.5), (5900, 270, 4.5)]
    load_db, uneven_db = blade_load_db(), 0.9 * flutter(per_s=42)
    clicks = impacts(per_s=1800, spread_db=2.5)
    beat = strokes(per_s=110, decay_s=.0006) - 1
    slaps = sum(np.exp(-((TIME - s - THUMP_LAG_S) / slap_s) ** 2) * from_db(thump_db)
                for s, _, _, thump_db in BITES)
    boom_db = -31 + 0.4 * load_db + slap_db * slaps / slaps.max()
    drives = [from_db(boom_db + uneven_db) * np.sqrt(1 + 0.3 * beat),
              from_db(-27.5 + load_db + uneven_db) * np.sqrt(1 + 0.22 * beat),
              from_db(-38.5 + 1.04 * load_db - fizz_sag_db_per_s * TIME)]
    boom, rasp, fizz = [through(gritty(clicks, grit) * drive, body(COARSE_SPECTRUM, modes, *band))
                        for drive, band in zip(drives, BANDS_HZ)]
    abrupt_drop = np.clip((drop_s - TIME) / 0.0028, 0, 1)
    return (slosh(boom) + rasp + fizz) * abrupt_drop


def churning(grit=0.21, rattle_db=1.17, body_lag_s=0.0091, settle_s=0.056):
    """Each fall of the vortex onto the blades is a surge of cavitation; the cup's body follows later."""
    # Broad spectrum of the quieter churning: frequency_hz, level_db
    spectrum = [(35, -10), (65, -16), (100, -10.5), (180, -18), (320, -15.5), (600, -14), (1200, -12),
                (2600, -13.5), (3700, -15), (4800, -25), (7800, -29.5), (11000, -33.5), (15000, -45)]
    # Resonances of the cup in it: centre_hz, width_hz, lift_db
    modes = [(240.5, 68, 6.9), (328, 46, 8.2), (401.4, 91, 12.4), (494, 50, 6.2), (617, 45, 5.6),
             (764, 99, 8.9), (858, 73, 4.7), (1000, 50, 2.6), (1430, 63, 1.4), (2104, 160, 6.4),
             (2915, 260, 4.4), (3260, 280, 4.1), (5700, 250, 5.6), (6260, 291, 5.3), (7260, 1200, 6)]
    # How fully the vortex collapses: time_s, relative_depth
    surge_depth = [(1.6, 0.88), (2.2, 0.88), (2.5, 1.07), (2.9, 0.98), (3.1, 0.61), (3.4, 0.6), (3.7, 0.85),
                   (4.45, 1.3), (5.1, 0.72), (6.1, 1)]
    # A restart in pulp at rest is duller and steadier until the vortex forms.
    fresh = sum((TIME >= start) * np.exp(-((TIME - start) / settle_s) ** 2) for start, _ in RUNS[1:])
    depth = in_time(surge_depth)[0] * (1 + 0.098 * flutter(per_s=13)) * (1 - fresh)
    surge = depth * vortex_surge()
    late_surge = np.interp(TIME - body_lag_s, TIME, surge)
    clicks = impacts(per_s=3000, spread_db=3.0)
    rattle = unit_rms(from_db(rattle_db * flutter(per_s=220)))
    body_db, rasp_db, fizz_db = in_time(PULP)
    drives = [from_db(body_db + 6 * fresh + 2 * late_surge) * run_gain(rise_s=0.016, coast_db_per_s=352),
              from_db(rasp_db - fresh + 4 * surge) * run_gain(rise_s=0.021, coast_db_per_s=501),
              from_db(fizz_db - fresh + 2.5 * surge) * run_gain(rise_s=0.03, coast_db_per_s=560)]
    return sum(through(gritty(clicks, grit) * rattle * drive, body(spectrum, modes, *band))
               for drive, band in zip(drives, BANDS_HZ))


def scene():
    """Blender and cup stand a little to the right of the microphone, in the air of the kitchen."""
    # Reflected share of the sounds at the counter and of the room tone: frequency_hz, side_to_mid_db
    counter_spread = [(60, -21), (300, -20), (700, -14.5), (1400, -8.5), (2800, -6), (5500, -1.5),
                      (12000, -1)]
    room_spread = [(60, -7), (130, -4.5), (290, -11), (640, -5.5), (1400, -2), (3000, 0), (12000, -0.5)]
    # Balance of each at the microphone: frequency_hz, left_minus_right_db
    blender_pan = [(60, -3), (100, -1.5), (180, -2), (310, -0.5), (550, -2), (950, -0.5), (1650, -5.5),
                   (2860, -7), (4970, 0.5), (8640, -16.5), (15000, -13)]
    cup_pan = [(60, -4), (150, -1), (380, 0), (950, -1.5), (2380, -6), (5980, -3), (15000, -22)]
    room_pan = [(60, 0), (700, 0), (2400, -3), (4400, 0.5), (8000, -4), (15000, -2)]
    blades = grinding() + hard_bits() + churning()
    blender = in_kitchen(blades, counter_spread, blender_pan, left_lag_samples=3)
    cup = in_kitchen(knocks() + catches() + twist(), counter_spread, cup_pan, left_lag_samples=4)
    air = in_kitchen(room_air(), room_spread, room_pan, left_lag_samples=0)
    blender += drone()
    cup += (thumps() + clacks() + hollow_ring() + bubbles()) * from_db([[-1], [1]])
    return blender + cup + air + hum_tones() + counter_bumps() + housing_taps()


def record(dry):
    """The deepest bass is rolled off and the top is cut steeply."""
    dry = signal.sosfilt(signal.butter(2, 36, "high", fs=SR, output="sos"), dry)
    return signal.sosfilt(signal.ellip(12, .1, 90, 15550, fs=SR, output="sos"), dry)


dry = scene()
out = record(dry)
generate_wav(out)
```